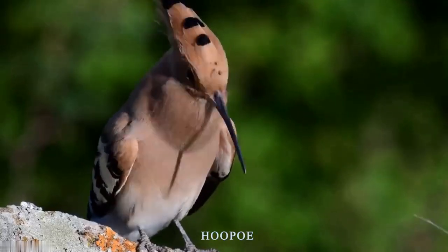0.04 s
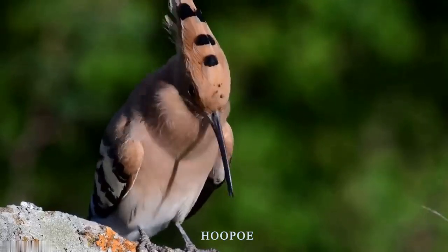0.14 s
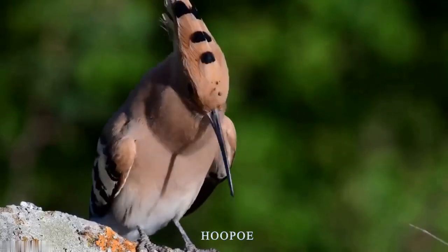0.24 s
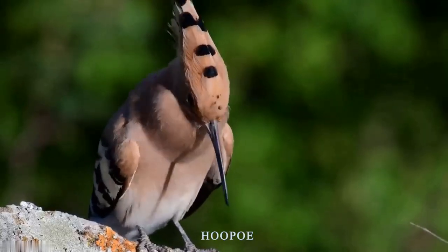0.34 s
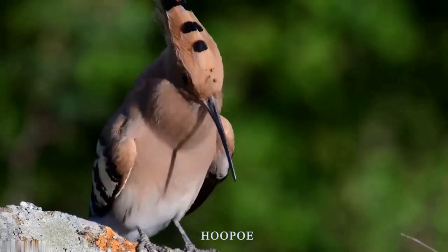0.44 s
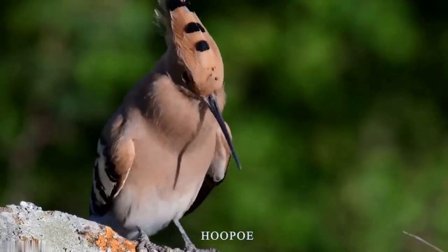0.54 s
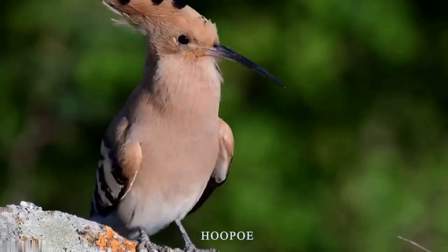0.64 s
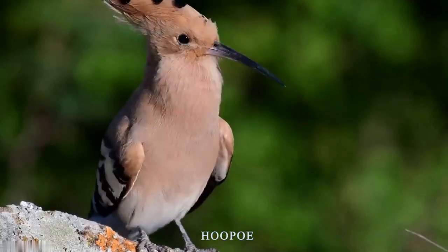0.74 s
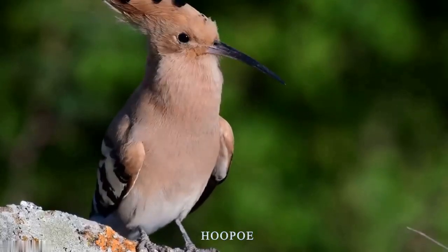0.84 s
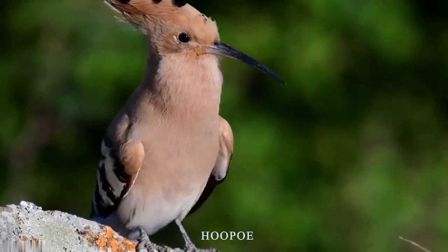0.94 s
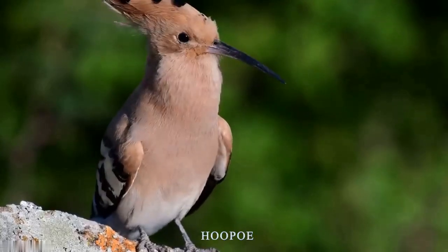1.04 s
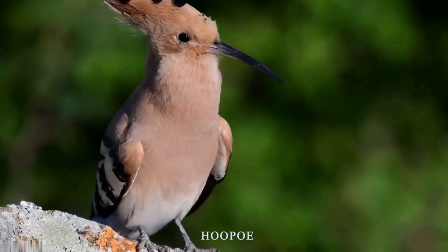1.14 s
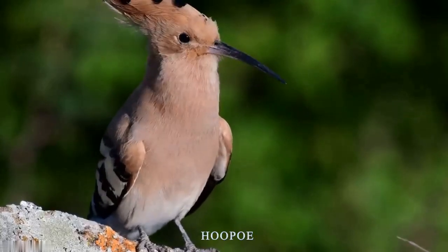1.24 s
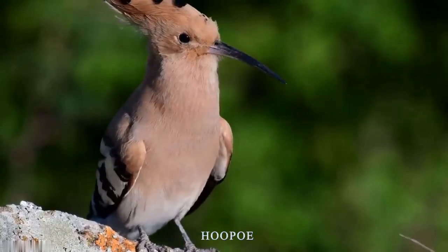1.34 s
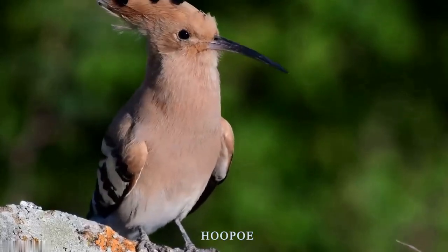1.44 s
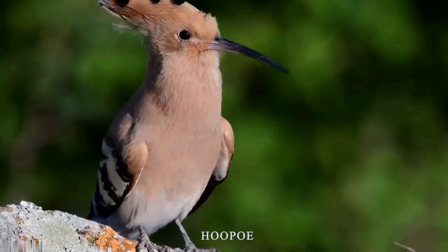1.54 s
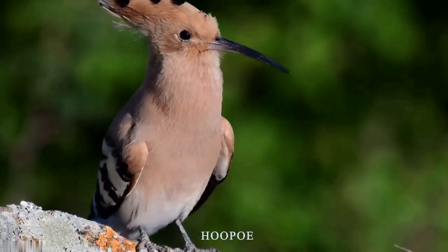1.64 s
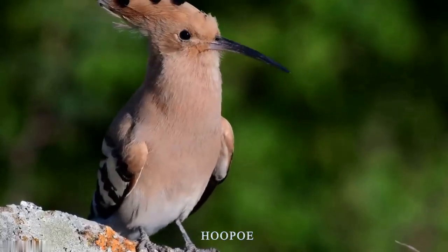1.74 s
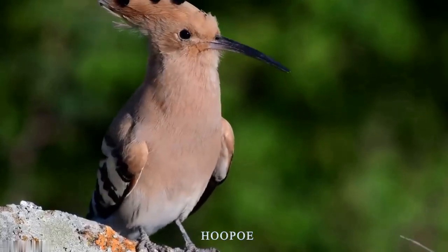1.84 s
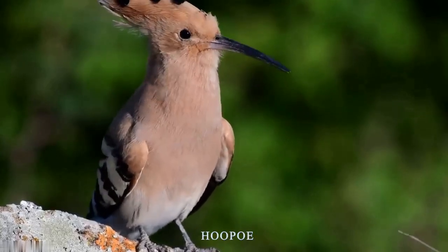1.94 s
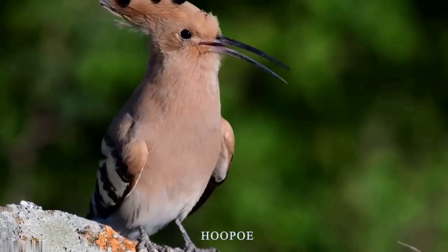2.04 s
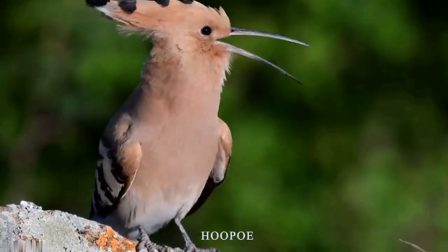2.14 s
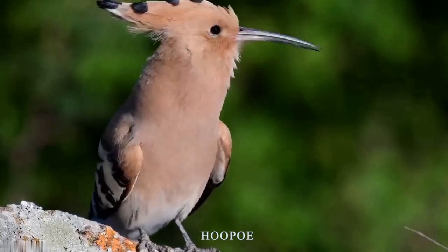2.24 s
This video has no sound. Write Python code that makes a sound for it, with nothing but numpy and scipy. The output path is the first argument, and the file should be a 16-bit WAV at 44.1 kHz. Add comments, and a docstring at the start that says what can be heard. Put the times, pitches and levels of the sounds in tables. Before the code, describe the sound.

Three quick, mellow hoopoe hoots, then only quiet open air with high crickets and tiny bird calls.

```python
"""A hoopoe gives one soft three-note hoot: nearly pure tones that slide up, swell and stop quickly.
The trees answer faintly, with a few single echoes and a scattered tail.
Two field crickets chirp throughout in short bursts of tone, one nearer than the other.
Small birds tick with falling flicks and call with thin arched whistles; a harsh call, made of clicks
through a resonance, starts on the right at the end. Under it lie faint bumps, quiet air and hiss."""
import sys
import numpy as np
from scipy import signal
from scipy.fft import rfft, irfft
from scipy.io import wavfile
from scipy.ndimage import uniform_filter1d

SR = 44100
rng = np.random.default_rng(int(sys.argv[2]) if len(sys.argv) > 2 else 0)


def wrap_up_sound(samples):
    """Save the sound to the file named by the first command line argument, as 16-bit audio."""
    columns = np.atleast_2d(samples).T
    # keep every value between -1 and 1, then stretch to whole-number steps
    tamed = np.clip(columns, -1, 1)
    steps = np.round(tamed * 32767).astype(np.int16)
    wavfile.write(sys.argv[1], SR, steps)


N = 101430  # length of the scene in samples

# The three notes of the hoot. Each row: start in seconds, length in seconds, level in dB, level of the
# buzz at the close in dB against the note, then four pitches in Hz at even steps through the note.
HOOT_NOTES = [(0.196, 0.12, -24, -46.5, 671, 665, 656.6, 635.6),
              (0.398, 0.12, -22.5, -33, 663, 663.6, 672.2, 663),
              (0.608, 0.12, -23, -31, 648.7, 655, 670, 673)]
# Overtones of the hoot. Each row: multiple of the pitch, level in dB against the note.
HOOT_OVERTONES = list(zip(range(2, 5), [-38.5, -48.5, -61]))
# Single echoes of the hoot. Each row: delay in seconds, level in dB.
HOOT_ECHOES = [(.022, -38), (.052, -34.5), (.135, -42.5)]
# Chirps of each cricket. Each row: start in seconds, level in dB, stretch of the stroke spacing (a factor).
NEAR_CRICKET_CHIRPS = [(0.1665, -52, 0.99), (0.4675, -56, 1.02), (0.759, -52, 1.03), (1.0425, -49, 1),
                       (1.3225, -49.5, 1.05), (1.601, -46.5, 1.017), (1.875, -45.5, 0.99),
                       (2.145, -51.5, 0.96)]
FAR_CRICKET_CHIRPS = [(-0.049, -62.5, 0.98), (0.186, -63.5, 1.0), (0.395, -67, 1.0), (0.669, -63.5, .98),
                      (0.957, -63, 0.93), (1.196, -61, 0.99), (1.461, -60.5, 0.98), (1.703, -62, .98),
                      (1.975, -66, 0.92), (2.225, -74, 0.97)]
# Wing strokes of one chirp. Each row: time after the chirp's start in seconds (before stretching),
# length in seconds, level in dB against the chirp, pitch offset in Hz.
WING_STROKES = [(0, .0145, -4.5, -40), (0.022, .0225, -1.9, -10), (0.054, 0.024, -1, 3.5),
                (0.09, 0.023, -1.56, -1)]
# Sharp ticks of a small bird. Each row: start in seconds, gap between its two flicks in seconds, level in dB.
BIRD_TICKS = [(0.381, 0.0077, -53), (0.756, 0.0057, -51), (2.0987, 0.0076, -49.5)]
# Distant yodelled calls. Each row: start in seconds, level in dB.
YODEL_CALLS = [(1.021, -55), (2.103, -57.5)]
# Faint dull bumps. Each row: start in seconds, pitch in Hz, length in seconds, level in dB.
DULL_BUMPS = [(0.012, 297, 0.023, -58), (1.09, 899, 0.02, -62.5)]
# Tone colour of the outdoor air. Each row: frequency in Hz, relative strength in dB per Hz.
AIR_COLOUR = [(15, -10), (40, -4.5), (90, 1.5), (200, -4), (450, -8), (1000, -11.5), (1600, -16),
              (2400, -18.5), (4000, -20), (6000, -18.5), (8000, -36), (15000, -52)]
# Left-right likeness of the air. Each row: frequency in Hz, likeness from 0 to 1.
AIR_LIKENESS = [(40, 1), (110, .62), (200, 0.7), (400, .25), (1300, 0), (5000, 0)]
# Tone colour of the microphone hiss. Each row: frequency in Hz, relative strength in dB per Hz.
HISS_COLOUR = [(500, -6.5), (4000, -1), (9500, 4), (15500, 0.5)]
# Narrow dips in the final sound. Each row: centre in Hz, width in Hz.
NARROW_DIPS = [(2600, 322), (7720, 560)]

# hoopoe
OPEN_S, OPEN_WIDTH_S, CLOSE_S = 0.028, 0.007, 0.024  # the tone catches, and is cut off at the end
SWELL_TOP, SWELL_DB = 0.69, 34  # share of the note where it is loudest; fall-off either side
PITCH_FROM = 0.27  # share of the note where the listed pitches begin
SCOOP_HZ, SCOOP_S, SCOOP_WIDTH_S = 64.5, 0.025, 0.0019  # each note slides up from below
BUZZ_BEFORE_S, BUZZ_WIDTH_S = 0.015, 0.013  # the buzz peaks just before the note ends
HOOT_PAN_DB, HOOT_LEAD_S, HOOT_WET_DB = -3, 0.00003, -34.5
TREES_DELAY_S, TREES_T60_S = 0.0069, 0.42  # T60 is the time an echo tail takes to fade by 60 dB

# crickets
NEAR_HZ, FAR_HZ = 4787, 4630
STROKE_SAG_HZ, STROKE_BEND, STROKE_SHAPE, STROKE_ROUGH = 430, 2.82, 0.84, 0.27
NEAR_PAN_DB, FAR_PAN_DB, CRICKET_LEAD_S = -6.5, -5, 0.000032
CRICKET_WET_DB, CRICKET_T60_S = -19.5, 0.2

# ticks
TICK_TOP_HZ, TICK_FALL_HZ, TICK_FLICK_S = 6690, 2907, 0.009
TICK_FIRST_DB, TICK_ROUGH, TICK_PAN_DB = -4, 0.63, -4.5  # the first flick is the softer one
TICK_LEAVES_DB, TICK_LEAVES_T60_S, TICK_WET_DB = -3, 0.045, -9.5

# yodelled calls
CALL_S, CALL_HZ, CALL_ARCH_HZ = 0.056, 1612, 186
FLIP_HZ, FLIP_AT_S, FLIP_HALF_S = 231, 0.03, 0.0052  # size, middle and half length of the flip

# harsh call
RASP_AT_S, RASP_DB, RASP_FADE_DB_PER_S, RASP_PAN_DB = 2.259, -58.5, 87, -20
RASP_CLICKS_PER_S, RASP_HZ, RASP_HALF_WIDTH_HZ = 240, 1934, 240
RASP_HISS_DB = -10.5  # against the throat sound

# background and final filters
AIR_DB, AIR_PATCH_DB, HISS_DB = -62, 1.53, -68.5
EDGE_HZ = 15680  # the top of the band


def amp(db):
    """Turns decibels into a gain."""
    return 10 ** (np.asarray(db) / 20)


def unit(x):
    """Scales a sound to an rms (average strength) of 1."""
    return x / np.sqrt(np.mean(x ** 2) + 1e-20)


def read(points, hz):
    """Reads a table between its rows, on a log-frequency axis."""
    f, value = np.transpose(points)
    return np.interp(np.log(hz + 1), np.log(f + 1), value)


def add(mix, s, sound):
    """Mixes a sound in at time s, trimming what lies outside the scene."""
    at = round(s * SR)
    sound = sound[max(-at, 0):]
    part = mix[max(at, 0):][:len(sound)]
    part += sound[:len(part)]


def noise(gain):
    """Makes full-length noise whose spectrum follows gain(hz)."""
    spectrum = rfft(rng.standard_normal(N))
    return unit(irfft(spectrum * gain(np.fft.rfftfreq(N, 1 / SR)), N))


def waver(rate_hz):
    """Makes a random motion that is no faster than about rate_hz."""
    return noise(lambda hz: 1 / (1 + (hz / rate_hz) ** 4))


def place(x, pan_db, lead_s=0):
    """Makes two channels: left is pan_db louder and lead_s earlier (negative: softer, later)."""
    hz = np.fft.rfftfreq(N, 1 / SR)
    left = irfft(rfft(x) * np.exp(2j * np.pi * hz * lead_s), N)
    return np.array([left * amp(pan_db / 2), x * amp(-pan_db / 2)])


def trees(x, t60, same=.5, delay_s=TREES_DELAY_S):
    """Scattered echoes from foliage: sparse random taps that fade, partly alike in the two ears."""
    t = np.arange(SR // 2) / SR
    taps = rng.standard_normal((3, len(t))) * (rng.random((3, len(t))) < 1 / 20)
    same = np.clip(same, 0, 1)
    tail = np.sqrt(same) * taps[2] + np.sqrt(1 - same) * taps[:2]
    tail = tail * amp(-60 * t / t60) * (t > delay_s)
    tail = tail / np.linalg.norm(tail, axis=1, keepdims=True)
    return signal.fftconvolve(x[None], tail, axes=1)[:, :N]


def hoopoe():
    """Nearly pure tones from a swollen throat; the octave overtone flares as the throat closes."""
    out, echoes, jitter = np.zeros(N), np.zeros(N), waver(rate_hz=160)
    for start, length, db, buzz_db, *pitch_hz in HOOT_NOTES:
        t = np.arange(0, length, 1 / SR)
        u = t / length  # share of the note, 0 to 1
        hz = np.interp(u, np.linspace(PITCH_FROM, 1, len(pitch_hz)), pitch_hz)
        hz = hz - SCOOP_HZ / (1 + np.exp((t - SCOOP_S) / SCOOP_WIDTH_S))
        hz = hz + 0.95 * jitter[round(start * SR):][:len(t)]
        phase = 2 * np.pi * np.cumsum(hz) / SR
        opening = 1 / (1 + np.exp((OPEN_S - t) / OPEN_WIDTH_S))
        closing = np.sin(np.pi / 2 * np.minimum((length - t) / CLOSE_S, 1))
        tone = amp(-SWELL_DB * (u - SWELL_TOP) ** 2) * np.sin(phase)
        overtones = sum(amp(level) * np.sin(k * phase) for k, level in HOOT_OVERTONES)
        overtones = overtones * amp(-8 * (u - .5))  # they weaken through the note
        flare = np.exp(-((length - BUZZ_BEFORE_S - t) / BUZZ_WIDTH_S) ** 2)
        buzz = amp(buzz_db) * flare * np.cos(2 * phase)
        add(out, start, amp(db) * opening * closing * (tone + overtones + buzz))
    for delay, db in HOOT_ECHOES:
        add(echoes, delay, amp(db) * out)
    direct = place(out, HOOT_PAN_DB, HOOT_LEAD_S)
    tail = amp(HOOT_WET_DB) * trees(out, TREES_T60_S, same=0.99)
    return direct + place(echoes, pan_db=0, lead_s=-.00015) + tail


def cricket(chirps, top_hz, pan_db):
    """Four wing strokes a chirp, the first the shortest; the wing's tone sags as a stroke slows."""
    out = np.zeros(N)
    for start, db, stretch in chirps:
        for after, length, stroke_db, offset_hz in WING_STROKES:
            u = np.arange(0, length, 1 / SR) / length
            stroke_hz = top_hz + offset_hz + 12 * rng.standard_normal()  # no two strokes quite alike
            hz = stroke_hz - STROKE_SAG_HZ * u ** STROKE_BEND
            swell = abs(np.sin(np.pi * u)) ** STROKE_SHAPE
            stroke = swell * np.sin(2 * np.pi * np.cumsum(hz) / SR)
            add(out, start + after * stretch, amp(db + stroke_db) * stroke)
    out = out * (1 + STROKE_ROUGH * waver(rate_hz=300))
    grass = amp(-15) * trees(out, t60=.015, same=0, delay_s=.0005)
    tail = amp(CRICKET_WET_DB) * trees(out, CRICKET_T60_S, same=0.12)
    return place(out, pan_db, CRICKET_LEAD_S) + grass + tail


def ticks():
    """Contact notes of a small bird: two very fast downward flicks, smeared by nearby leaves."""
    out = np.zeros(N)
    u = np.arange(0, TICK_FLICK_S, 1 / SR) / TICK_FLICK_S
    hz = TICK_TOP_HZ - TICK_FALL_HZ * u
    flick = np.sin(np.pi * u ** 0.67) ** 2 * np.sin(2 * np.pi * np.cumsum(hz) / SR)
    for start, gap, db in BIRD_TICKS:
        add(out, start, amp(db + TICK_FIRST_DB) * flick)
        add(out, start + gap, amp(db) * flick)
    out = out * (1 + TICK_ROUGH * waver(rate_hz=990))
    leaves = amp(TICK_LEAVES_DB) * trees(out, TICK_LEAVES_T60_S, same=.5, delay_s=.001)
    leaves = amp([[TICK_PAN_DB / 2], [-TICK_PAN_DB / 2]]) * leaves  # on the bird's side
    tail = amp(TICK_WET_DB) * trees(out, t60=0.33, same=0.17)
    return place(out, TICK_PAN_DB) + leaves + tail


def far_calls():
    """A thin whistle whose pitch arches up and back, and flips briefly to a higher note."""
    out, t = np.zeros(N), np.arange(0, CALL_S, 1 / SR)
    arch = abs(np.sin(np.pi * t / CALL_S))
    from_flip = abs(t - FLIP_AT_S)
    hz = CALL_HZ + CALL_ARCH_HZ * arch + FLIP_HZ * (from_flip < FLIP_HALF_S)
    breaks = np.tanh(abs(from_flip - FLIP_HALF_S) / 0.0016)  # the tone drops out at each jump
    call = np.sqrt(arch) * breaks * np.sin(2 * np.pi * np.cumsum(hz) / SR)
    for start, db in YODEL_CALLS:
        add(out, start, amp(db) * call)
    out = out * (1 + 0.19 * waver(rate_hz=150))
    return place(out, pan_db=-1.0, lead_s=-.00017) + amp(-13) * trees(out, t60=0.17, same=0.24)


def rasp():
    """A harsh call: uneven clicks and noise through one throat resonance, with a little bright hiss."""
    t, hz = np.arange(N) / SR - RASP_AT_S, np.fft.rfftfreq(N, 1 / SR)
    turns = np.cumsum(RASP_CLICKS_PER_S * (1 + .2 * waver(rate_hz=100))) / SR
    clicks = np.diff(np.floor(turns), prepend=0)  # one click at each whole turn
    clicks = unit(clicks * amp(2.5 * waver(rate_hz=200)))
    drive = clicks + 0.49 * rng.standard_normal(N)
    resonance = 1 / (1 + 1j * (hz - RASP_HZ) / RASP_HALF_WIDTH_HZ) ** 2
    throat = unit(irfft(rfft(drive) * resonance, N))
    hiss = amp(RASP_HISS_DB) * noise(lambda f: f / (f + 2000) / (1 + (f / 8500) ** 8))
    level = np.clip(t / 0.0016, 0, 1) * amp(RASP_DB - RASP_FADE_DB_PER_S * np.maximum(t, 0))
    return place(level * (throat + hiss), RASP_PAN_DB)


def bumps():
    """Soft, short, dull blips: a steady tone that swells and fades once."""
    out = np.zeros(N)
    for start, hz, length, db in DULL_BUMPS:
        t = np.arange(0, length, 1 / SR)
        swell = np.sin(np.pi * t / length) ** 2
        add(out, start, amp(db) * swell * np.sin(2 * np.pi * hz * t))
    return out


def air():
    """A low wash of open air, faintly restless in patches, and steady hiss alike in both ears."""
    frames, hz = N // 256 + 5, np.fft.rfftfreq(1024, 1 / SR)
    a, b, c, d, patches = rng.standard_normal((5, frames, 513)).transpose(0, 2, 1)
    patches = uniform_filter1d(patches, size=8, axis=0)  # smooth across frequency
    patches = unit(uniform_filter1d(patches, size=16, axis=1))  # and across time
    same = np.clip(read(AIR_LIKENESS, hz), -1, 1)[:, None]
    left = a + 1j * b
    right = same * left + np.sqrt(1 - same ** 2) * (c + 1j * d)
    colour = amp(read(AIR_COLOUR, hz)[:, None] + AIR_PATCH_DB * patches)
    spectra = np.array([left, right]) * colour
    wash = unit(signal.istft(spectra, nperseg=1024, noverlap=768)[1][:, :N])
    return amp(AIR_DB) * wash + amp(HISS_DB) * noise(lambda f: amp(read(HISS_COLOUR, f)))


def scene():
    """The hoopoe in front; crickets, other birds, bumps and air behind."""
    near = cricket(NEAR_CRICKET_CHIRPS, NEAR_HZ, NEAR_PAN_DB)
    far = cricket(FAR_CRICKET_CHIRPS, FAR_HZ, FAR_PAN_DB)
    return hoopoe() + near + far + ticks() + far_calls() + rasp() + bumps() + air()


def record(dry):
    """Two narrow notch filters, then a steep low-pass that limits the band."""
    hz = np.fft.rfftfreq(2 * N, 1 / SR)
    gain = np.prod([abs(hz - f) / np.hypot(hz - f, width / 2) for f, width in NARROW_DIPS], axis=0)
    gain = gain ** 1.5 + 0.024  # the dips do not reach full silence
    notched = irfft(rfft(dry, 2 * N) * gain)[:, :N]
    low_pass = signal.firwin(1023, EDGE_HZ, window=("kaiser", 9), fs=SR)
    return signal.oaconvolve(notched, low_pass[None], "same")


dry = scene()
out = record(dry)
wrap_up_sound(out)
```